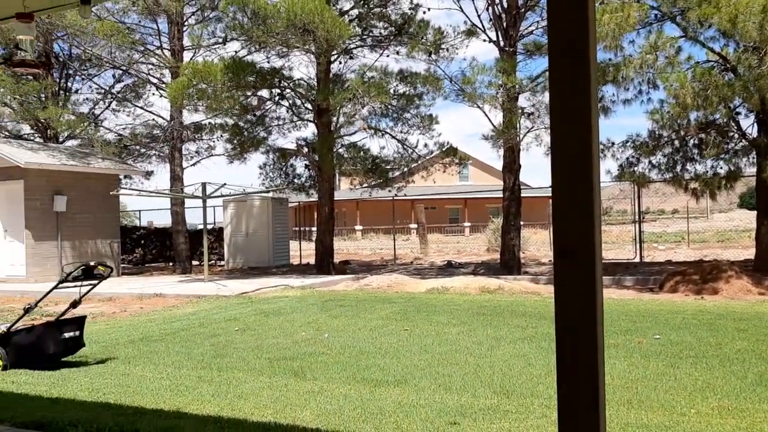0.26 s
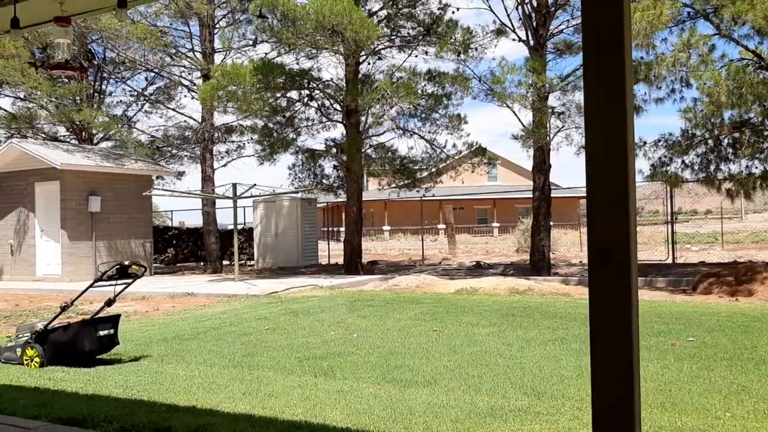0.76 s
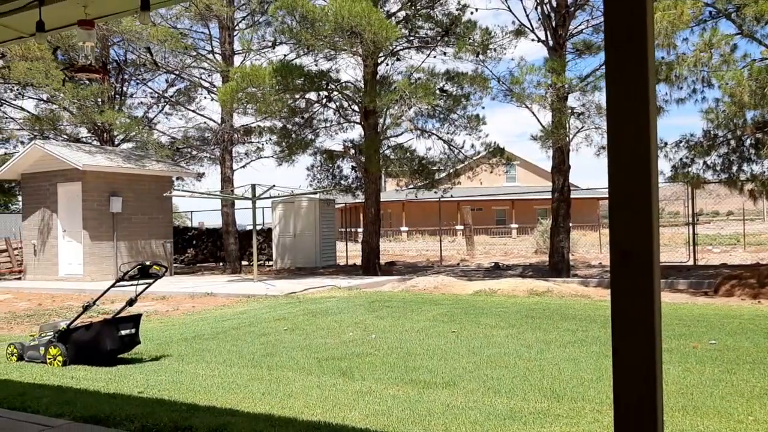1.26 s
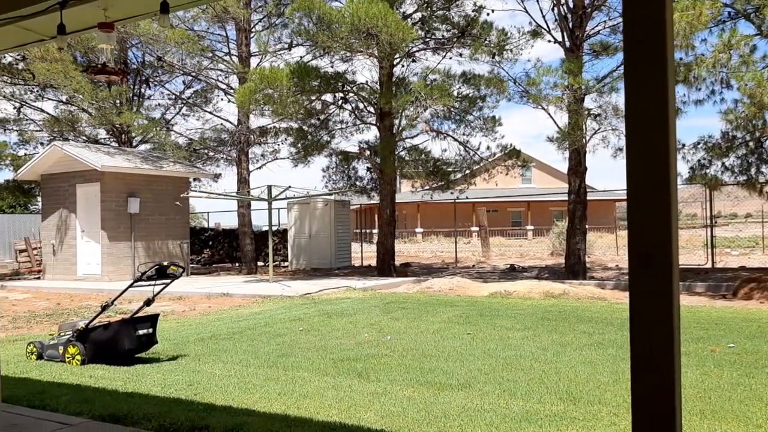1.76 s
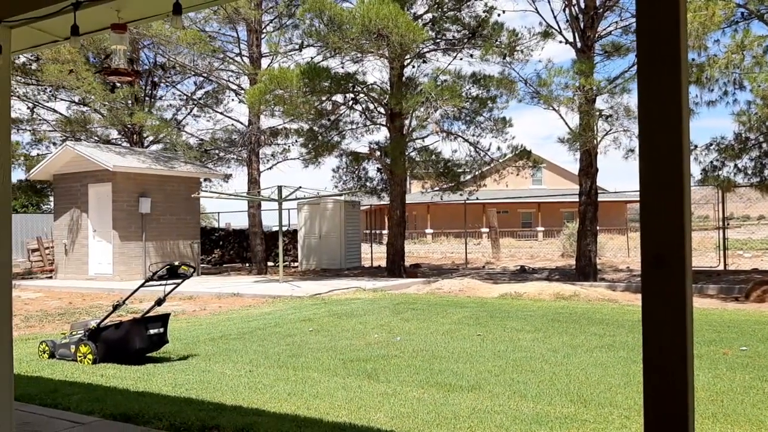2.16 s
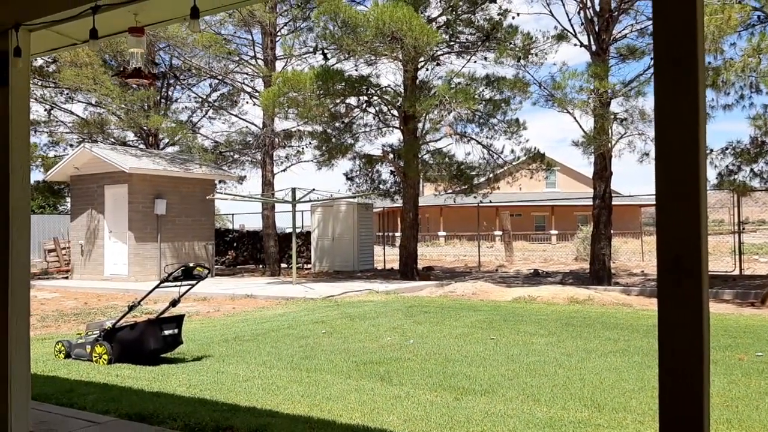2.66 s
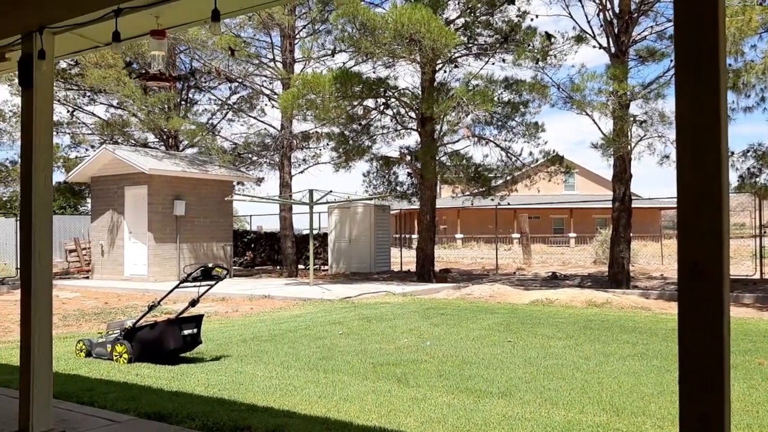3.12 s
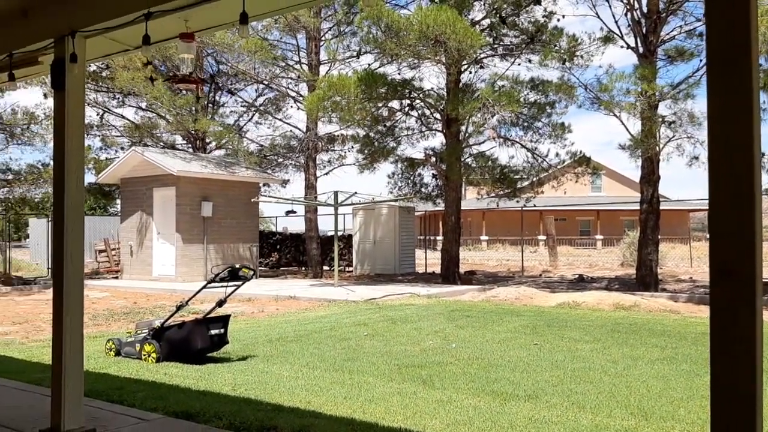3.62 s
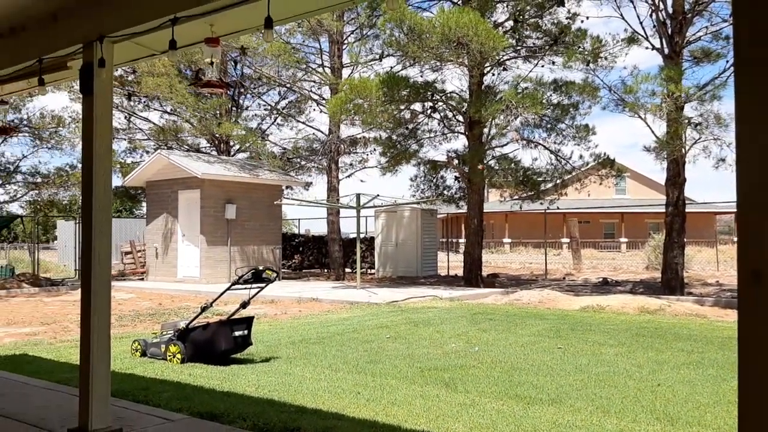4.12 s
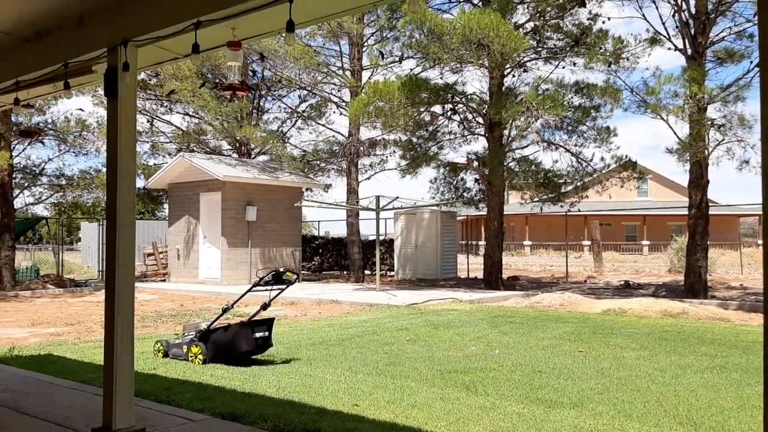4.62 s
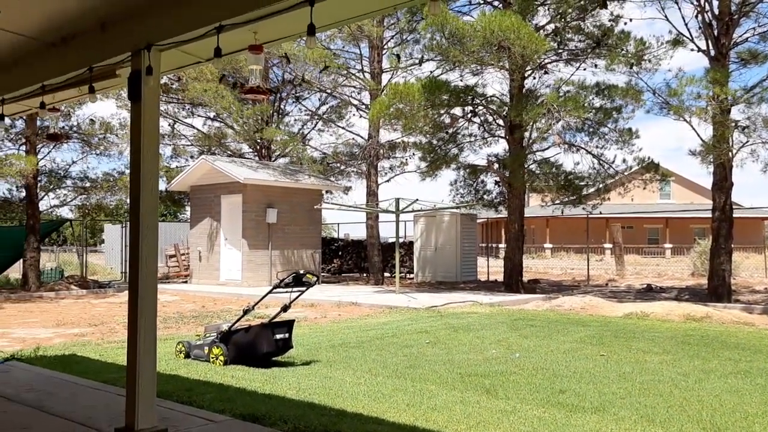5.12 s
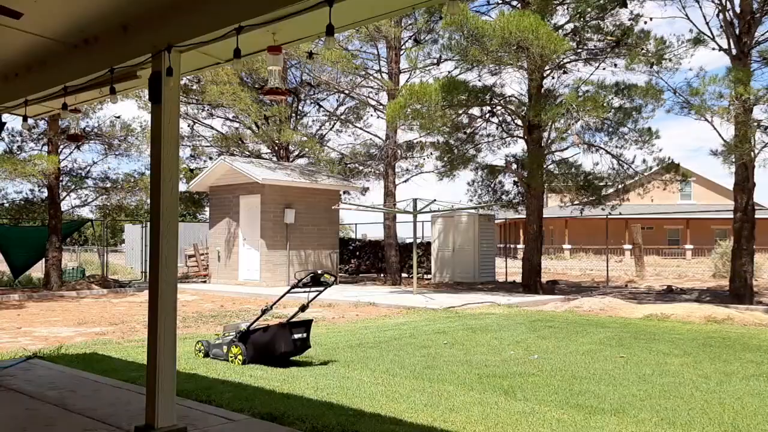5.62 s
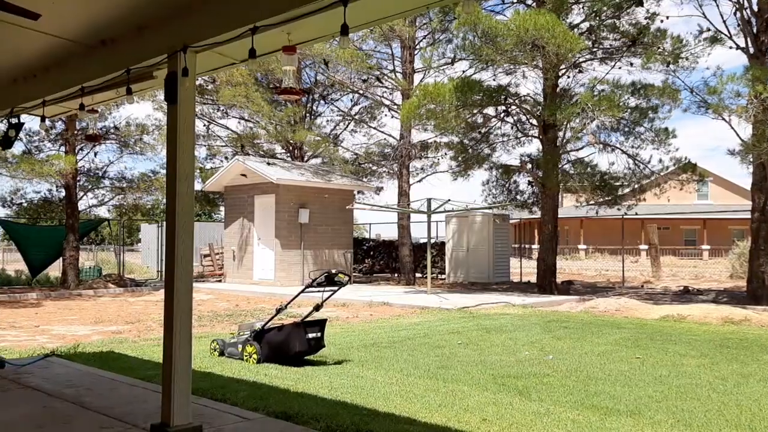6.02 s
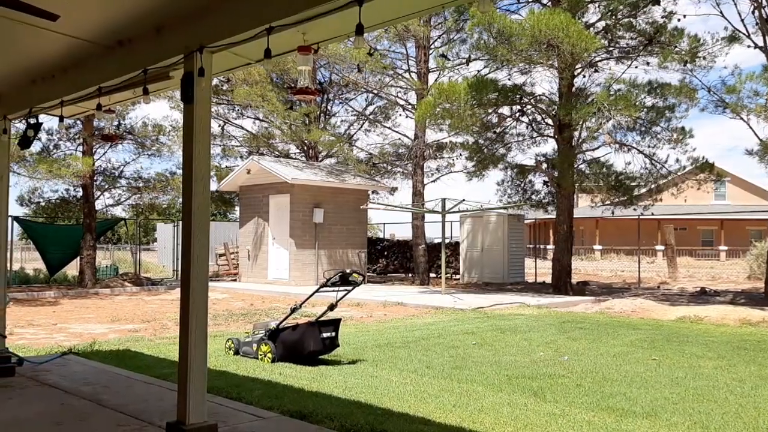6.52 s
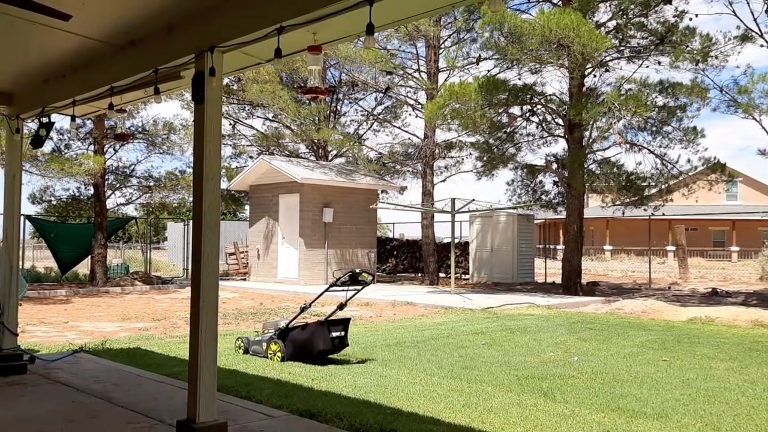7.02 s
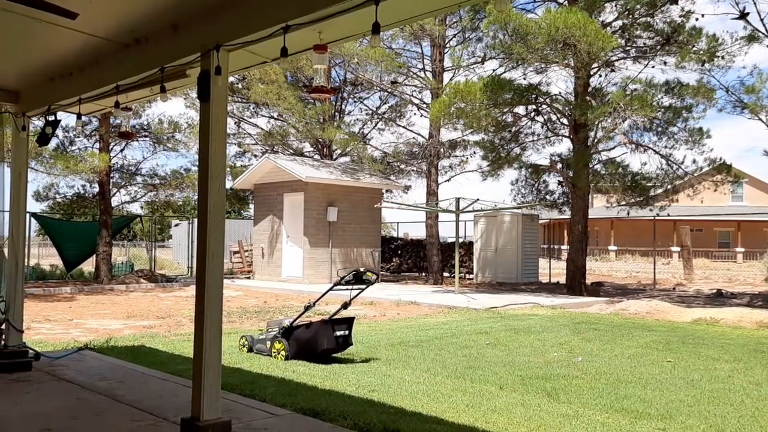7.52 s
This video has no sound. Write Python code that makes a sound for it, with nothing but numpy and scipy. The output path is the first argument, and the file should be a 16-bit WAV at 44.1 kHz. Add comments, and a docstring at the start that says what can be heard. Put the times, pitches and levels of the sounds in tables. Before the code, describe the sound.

Hummingbirds squabble under a porch roof with rasping buzzes, sharp chips and thin squeaks, over distant twitter, low rumble and dull wind bumps.

```python
"""Under a porch roof, hummingbirds squabble round the feeders: rasping buzzes, steep chips and thin squeaks,
all made of gliding sine partials with jittered pitch and level. One bird flies past with wings that whistle
once a stroke. Bounces and a short noise tail scatter every call; more birds twitter beyond, as endless falling
glides. Filtered noise makes the yard, the pines and a breeze whose eddies thump the left microphone port."""
import sys
import numpy as np
from scipy import signal
from scipy.fft import rfft, irfft, next_fast_len
from scipy.io import wavfile
from scipy.ndimage import uniform_filter1d

SR = 44100
rng = np.random.default_rng(int(sys.argv[2]) if len(sys.argv) > 2 else 0)


def pcm_store(signal):
    """Save signal as 16-bit PCM."""
    levels = np.round(np.clip(np.atleast_2d(signal), -1, 1) * 32767)
    wavfile.write(sys.argv[1], SR, levels.astype(np.int16).T)


N = 342638

# What a beak radiates. Each row: frequency in Hz, gain in dB.
BEAK_RESPONSE = [(1400, 7), (2100, 2), (3200, 2), (5000, 2.5), (7300, 5.5), (9000, -2), (12000, 6),
                 (15500, 4)]


def undb(db):
    """Decibels to gain."""
    return 10 ** (np.asarray(db) / 20)


def unit(x):
    """Scale to rms 1."""
    return x / np.sqrt(np.mean(x ** 2) + 1e-20)


def curve(rows):
    """Draw a (seconds, value) table as straight lines, sample by sample."""
    s, value = np.transpose(rows)
    return np.interp(np.arange(N) / SR, s, value)


def gain_at(hz, spectrum):
    """Gain of a (Hz, dB) spectrum at the given frequencies, interpolated over log frequency."""
    f, db = np.transpose(spectrum)
    return undb(np.interp(np.log(np.maximum(hz, 1)), np.log(f), db))


def coloured(x, spectrum):
    """Filter by a (Hz, dB) spectrum."""
    size = next_fast_len(N + SR // 10)
    gain = gain_at(np.fft.rfftfreq(size, 1 / SR), spectrum)
    return irfft(rfft(x, size) * gain, size)[..., :N]


def noise(spectrum):
    """Coloured noise of rms 1."""
    return unit(coloured(rng.standard_normal(N), spectrum))


def wander(t, rate, size=512):
    """Random values, `rate` of them a second, joined by straight lines."""
    return np.interp(t * rate % size, np.arange(size), rng.standard_normal(size))


def partial(hz, order=1):
    """One harmonic of a gliding pitch, faded out between about 17.5 and 18.5 kHz."""
    phase = 2 * np.pi * order * np.cumsum(hz) / SR
    return np.sqrt(2) * np.sin(phase) * np.clip((SR * .42 - order * hz) / 1000, 0, 1)


def fade(t, rise, fall):
    """Rounded rise and fall at the ends of t, in the unit of t."""
    fade_in = np.sin(np.pi / 2 * np.clip((t - t[0]) / rise, 0, 1))
    fade_out = np.sin(np.pi / 2 * np.clip((t[-1] - t) / fall, 0, 1))
    return fade_in * fade_out


def add(out, x, s):
    """Mix x into out from time s."""
    i = int(round(s * SR))
    a, b = max(i, 0), min(i + len(x), N)
    if b > a:
        out[a:b] += x[a - i:b - i]


def add_call(out, call, s, pan_db, bounce=0.82, spread_s=0.023, count=6, ahead=False):
    """A sound reaches each port directly, then by a few random bounces that weaken with delay."""
    for port, side in zip(out, (1, -1)):
        # share the energy between the direct sound and its bounces
        heard = call * undb(side * pan_db / 2) / np.sqrt(1 + count * bounce ** 2 / 2)
        lag = rng.uniform(0, .0003)
        # from straight ahead, the direct sound meets both ports at once
        add(port, heard, s if ahead else s + lag)
        for path in (np.arange(count) + rng.uniform(0, 1, count)) / count:
            add(port, heard * bounce * (1 - path / 2), s + path * spread_s)


def porch(dry, t60=0.16, wet_db=-9, dull_hz=9000):
    """A short diffuse tail between roof, wall and floor: decaying noise, weaker in the top."""
    t = np.arange(SR // 2) / SR
    decay = np.exp(-np.log(1000) * t / t60)
    tail = rng.standard_normal((2, len(t))) * decay * np.minimum(t / 0.024, 1)
    tail /= np.sqrt(np.sum(tail ** 2, axis=1, keepdims=True))
    tail = signal.sosfilt(signal.butter(1, dull_hz, fs=SR, output="sos"), tail)
    return dry + undb(wet_db) * signal.fftconvolve(dry, tail, axes=1)[:, :N]


def pines(centre_hz=800):
    """Air in the pines: a soft rush of noise, independent at each port, that slowly swells and sinks."""
    # Each row: time in seconds, level in dB.
    rush_level = [(0, -57), (1.2, -57.5), (2.6, -54), (4.0, -52.5), (5.0, -51.5), (6.3, -53.5),
                  (7.3, -55.5)]
    rush = [(centre_hz / 4, -6), (centre_hz, 0), (centre_hz * 2, -5), (centre_hz * 8, -30)]
    return np.array([noise(rush), noise(rush)]) * undb(curve(rush_level))


def yard(yard_db=-48, apart_hz=1100, side_share=0.08):
    """Distant rumble and rustling: steady noise, nearly alike at both ports in the bass, apart above."""
    # Each row: frequency in Hz, relative density in dB per Hz.
    yard_spectrum = [(25, -19), (55, 0), (110, 0), (220, 0), (310, -10.5), (430, -8.5), (520, -14.5),
                     (950, -18.5), (1350, -39), (2500, -27), (5000, -27), (15500, -28)]
    side = noise(yard_spectrum)
    highpass = signal.butter(2, apart_hz, "high", fs=SR, output="sos")
    side = side_share * side + (1 - side_share) * signal.sosfilt(highpass, side)
    return (noise(yard_spectrum) + side * np.array([[1], [-1]])) * undb(yard_db)


def wind(breeze_db=1, right_db=-12.5, gust_db=4, buffet_db=0.5):
    """Turbulence rumbles at the exposed left port; single eddies thump it for a cycle or two."""
    # Each row: frequency in Hz, relative density in dB per Hz.
    rumble_spectrum = [(25, -20), (38, -5), (60, 0), (95, -0.5), (150, -9.5), (230, -13.5), (330, -25),
                       (600, -36.5), (1200, -41)]
    # Rumble at the left port. Each row: time in seconds, level in dB before trim and gusts.
    breeze_level = [(0, -49.5), (.3, -44), (.8, -44.5), (1.3, -52), (1.55, -41.5), (1.8, -48.5), (2.4, -36),
                    (2.6, -42), (2.8, -29), (3.1, -35.5), (3.45, -32), (3.6, -37), (4.4, -36), (4.7, -35),
                    (5.15, -34.5), (5.5, -43.5), (5.8, -44), (6.15, -32.5), (6.55, -42), (6.95, -37),
                    (7.1, -48.5), (7.77, -62)]
    # Eddies at the left port. Each row: time in seconds, pitch in Hz, level in dB before trim.
    eddies = [(2.391, 68, -27), (2.693, 72.6, -17.5), (2.819, 143, -14), (2.857, 80, -17.5),
              (2.965, 74.4, -15.5), (2.989, 77.4, -12.5), (3.376, 84.5, -18.5), (3.401, 141, -15.5),
              (3.815, 91, -22), (4.654, 101, -14.5), (4.752, 175, -8.5), (4.828, 97, -19.5),
              (5.63, 86, -21), (5.92, 120, -25), (6.099, 74, -21.5), (6.228, 83, -26), (6.953, 75, -26),
              (6.976, 94, -20.5)]
    t = np.arange(N) / SR
    level_db = curve(breeze_level) + breeze_db
    left, right = (noise(rumble_spectrum) * undb(level_db + gust_db * wander(t, 16)) for _ in range(2))
    for s, hz, db in eddies:
        # small eddies pass sooner: seconds from the middle until the swell has dropped to 1/e
        half = 0.0067 * (100 / hz) ** 1.75
        age = np.arange(-3 * half, 3 * half, 1 / SR)
        thump = -np.sin(2 * np.pi * hz * age) * np.exp(-(age / half) ** 2)
        add(left, thump * undb(db + buffet_db), s + age[0])
    return np.array([left, right * undb(right_db)])


def flock(flock_db=4, count=3):
    """Further birds blur into a twitter: restless falling glides that flare and fade, smeared by reflections."""
    # Each row: frequency in Hz, gain in dB.
    far_colour = [(1000, -32), (1450, -12), (2050, 4), (2900, -2), (4800, -2.5), (6000, 4), (7600, -0.5),
                  (9400, -2), (10500, -4), (15500, 11)]
    # How busy the further birds are. Each row: time in seconds, level in dB before trim.
    busy_level = [(0.0, -48.5), (0.39, -49), (0.95, -49.5), (1.51, -48), (1.71, -51), (2.34, -46),
                  (2.46, -49.5), (2.7, -46.5), (3.22, -50.5), (4.18, -45), (4.35, -51.5), (4.57, -50),
                  (5.15, -47.5), (5.99, -49), (6.58, -49.5), (7.47, -55), (7.64, -50), (7.77, -47.5)]
    t = np.arange(N) / SR
    out = np.zeros((2, N))
    for _ in range(count):
        # around 32 glides a second, each running from 0 to 1
        glide = np.cumsum(32 * undb(5 * wander(t, 25))) / SR % 1
        hz = 1600 * 9 ** (1 - glide) * (1 + .06 * wander(t, 1000, size=8192))
        # a glide lingers in the lows, so its top is lifted to spread the energy evenly
        voice = partial(hz) * np.sqrt(hz * np.sin(np.pi * glide))
        voice = voice * undb(3 * wander(t, 40))
        add_call(out, voice, 0, 0, bounce=0.72)
    twitter = unit(coloured(porch(out, wet_db=-5.5), far_colour))
    return twitter * undb(curve(busy_level) + flock_db)


def excitement(near, answer_s=0.079, join_in=0.41, calm=0.11):
    """The further birds flare up with the calls at the feeders and hush in the gaps: a gain of rms 1."""
    loudness = uniform_filter1d(np.mean(unit(near) ** 2, axis=0), int(answer_s * SR))
    return unit((np.abs(loudness) + calm) ** (join_in / 2))


def tick(ring_s=0.0042, dull_hz=6000):
    """Two small dry clicks: noise that dies within milliseconds, with a softened top."""
    # Each row: start in seconds, level in dB before bounces and softening.
    clicks = [(5.142, -29), (5.162, -33)]
    t = np.arange(SR // 50) / SR
    out = np.zeros((2, N))
    for s, db in clicks:
        click = rng.standard_normal(len(t)) * np.exp(-t / ring_s)
        add_call(out, click * undb(db), s, 0, bounce=.15)
    return signal.sosfilt(signal.butter(1, dull_hz, fs=SR, output="sos"), out)


def wings(beat_hz=42, sharpness=2.6, blur_s=0.5, bend_hz=90, waver_hz=125, wing_db=-1):
    """Air whistles through the wing tips once a stroke; the strokes blur together as the bird flies off."""
    # Whistle of the feathers. Each row: time in seconds, middle pitch in Hz, level in dB before trim.
    whistle = [(2.281, 5880, -40), (2.297, 5840, -37.5), (2.391, 6100, -39), (2.571, 6060, -41),
               (2.64, 6000, -36.5), (2.722, 5980, -44), (2.84, 5800, -42.5), (3.17, 5730, -48)]
    s, pitch_hz, db = np.transpose(whistle)
    t = np.arange(0, s[-1] - s[0], 1 / SR)
    stroke = 2 * np.pi * np.cumsum(beat_hz * (1 + 0.048 * wander(t, 10.9))) / SR
    hz = np.interp(t + s[0], s, pitch_hz)
    hz = hz + bend_hz * np.sin(stroke) + waver_hz * wander(t, 700)
    # sharp pulses of even power, flattening with time
    depth = .5 + sharpness * np.exp(-t / blur_s)
    pulses = np.exp(-depth * np.cos(stroke)) / np.sqrt(np.i0(2 * depth))
    size = pulses * undb(np.interp(t + s[0], s, db) + wing_db)
    out = np.zeros((2, N))
    add_call(out, partial(hz) * size * fade(t, .005, .03), s[0], 0, bounce=0.24, ahead=True)
    return out


def squeaks(squeak_db=-3, flicker_db=2, quaver_hz=170, hoarse=1.2, crest=0.242):
    """Whistles with an octave above rise a little, then droop; the lower they are, the rougher their pitch."""
    # Each row: start in seconds, length in seconds, top pitch in Hz before jitter,
    # share of that pitch lost by the end (0-1), level in dB before trim.
    calls = [(0.089, 0.055, 6170, 0.13, -47), (0.402, 0.053, 3800, 0.08, -47),
             (1.158, 0.035, 3890, 0.24, -45), (1.162, 0.057, 6930, 0.04, -42),
             (1.228, 0.033, 4100, 0.43, -45), (1.262, 0.032, 3130, 0.13, -45.5),
             (1.314, 0.039, 4300, .18, -44), (1.572, 0.056, 4240, 0.3, -41),
             (1.792, 0.043, 7600, 0.16, -39), (1.907, 0.031, 6050, 0.3, -42.5),
             (2.462, 0.081, 4210, 0.07, -44), (2.993, 0.023, 6500, 0.17, -33),
             (4.035, 0.019, 5820, 0.05, -38), (4.4, .075, 7210, 0.1, -41.5),
             (4.466, 0.023, 5950, .2, -40.5), (5.411, 0.054, 7230, 0, -41),
             (5.463, .026, 6130, 0.16, -41.5), (6.269, 0.017, 5700, 0.27, -41),
             (6.553, 0.017, 5700, .11, -40.5), (6.964, 0.014, 5420, .05, -42.5),
             (7.098, 0.059, 7100, 0.07, -41)]
    # Strength of the octave. Each row: top pitch in Hz, gain in dB.
    octave_gain = [(4200, -15.5), (5600, -2.5), (6500, -5.5), (7300, -7)]
    out = np.zeros((2, N))
    for start, length, top_hz, droop, db in calls:
        t = np.arange(0, max(length, .008), 1 / SR)
        # the pitch peaks at the crest, a share of the length
        hz = top_hz * (1 - droop * ((t / t[-1] - crest) / (1 - crest)) ** 2)
        hz = hz + quaver_hz * (6000 / top_hz) ** hoarse * wander(t, 994)
        tone = partial(hz) + gain_at(top_hz, octave_gain) * partial(hz, order=2)
        size = unit(fade(t, .15 * t[-1], 0.1 * t[-1]) * undb(flicker_db * wander(t, 140)))
        add_call(out, tone * size * undb(db + squeak_db), start, 0, bounce=0.47, ahead=True)
    return out


def buzz(length, pitch_hz, bright_db, rate_hz=118, rough=0.407, throb=0.16, flicker_db=3,
         overtone_db=-1, arch_hz=350, voice_top_hz=8560, swing_share=0.712):
    """The syrinx throws its pitch up and lets it fall about 120 times a second, never twice alike."""
    t = np.arange(0, max(length, .01) + 0.003, 1 / SR)
    cycle = 2 * np.pi * np.cumsum(rate_hz * (1 + 0.135 * wander(t, 24.7))) / SR
    saw = np.sin(cycle) + 0.44 * np.sin(2 * cycle)
    # the pitch swings less widely the nearer it lies to the top of the voice
    swing_hz = swing_share * (voice_top_hz - pitch_hz)
    hz = pitch_hz + swing_hz * (0.895 * saw + rough * wander(t, 1300))
    hz = hz + arch_hz * (np.sin(np.pi * t / t[-1]) - .8)
    ground = partial(hz) * gain_at(hz, BEAK_RESPONSE) / undb(7.0)
    # the overtone is strongest at the bottom of each swing
    overtone = undb(bright_db + overtone_db) * partial(hz, order=2) * (1 - .5 * saw)
    size = fade(t, 0.026 * t[-1], 0.34 * t[-1]) * (1 - throb * np.cos(cycle))
    return (ground + overtone) * unit(size * undb(flicker_db * wander(t, 165)))


def chips(end_hz=1550, knee_hz=6000, linger=.3, chip_db=2.5, overtone_db=-2.5, roll_db=-3.5, decay=0.26,
          rasp=0.0312, flicker_db=3, rasp_lead_s=0.005, rasp_s=0.0438, rasp_hz=6810, rasp_db=2.5):
    """With a short rasp the pitch plunges, then curls out below 2 kHz; harmonics follow through the beak."""
    # Each row: time in seconds when the pitch falls through 6 kHz, fall time in ms,
    # level in dB before trim, harshness in dB that lifts overtones and rasp.
    calls = [(0.15, 6.1, -49.5, 0.5), (0.272, 4.3, -53.5, 5), (0.523, 5.1, -53.5, -29),
             (0.598, 4.2, -57.5, 6.5), (0.673, 7.4, -59, 9.5), (0.721, 10, -56, 6), (0.943, 26, -58, 10),
             (1.126, 10.8, -53.5, 1.5), (1.369, 15, -57, 3), (1.477, 13.7, -54.5, 5),
             (1.665, 7.4, -45, 1.5), (1.825, 13, -53.5, 6), (2.037, 9.6, -51, 6), (2.162, 6.4, -52.5, 2.5),
             (2.349, 15, -61, 10), (2.458, 15, -47.5, 0), (2.593, 17, -50, 6), (2.714, 17, -48.5, -7),
             (2.856, 14.3, -50, -1), (3.079, 11.5, -50.5, 6), (3.159, 5.9, -49.5, 4.5),
             (3.266, 15, -50, 6.5), (3.362, 14, -49, 4.5), (3.662, 7.3, -57, 11), (3.769, 16, -52.5, 5),
             (3.807, 12, -51, -2), (3.896, 9.3, -51.5, 3.5), (4.086, 7.9, -55.5, 2), (4.19, 8, -50, 1),
             (4.262, 12, -51, -14), (4.673, 6.6, -48.5, 0.5), (4.817, 5.5, -53, 3.5), (4.893, 4.8, -52, 8),
             (4.977, 4.8, -49.5, 3.5), (5.072, 8.5, -56, 5), (5.122, 7.6, -47, -11), (5.378, 9.4, -54, 4.5),
             (5.626, 6.5, -51, 0.5), (5.925, 9.3, -57.5, 9.5), (6.146, 11.4, -50, 2), (6.453, 8, -51, -6),
             (6.572, 6.8, -51.5, -16), (6.735, 5.9, -45, -3), (6.86, 4.3, -46.5, 0), (6.99, 9.2, -54, -2.5),
             (7.146, 7.9, -47.5, -1.5), (7.275, 5.8, -53, -6), (7.413, 6, -51.5, -3.5),
             (7.457, 11, -58, 6.5), (7.612, 7.6, -48, -12)]
    out = np.zeros((2, N))
    for (s, fall_ms, db, bright_db), pan_db in zip(calls, rng.standard_normal(len(calls))):
        fall = fall_ms / 1000
        # age counts in fall times
        age = np.arange(-.8 * fall, 4.86 * fall, 1 / SR) / fall
        drop = (1 - linger) * np.exp(-1.3 * age) + linger * np.exp(-age / 2)
        hz = (end_hz + (knee_hz - end_hz) * drop) * (1 + rasp * wander(age * fall + 1, 1000))
        overtones = sum(partial(hz, order=k) * gain_at(k * hz, BEAK_RESPONSE) * undb(roll_db * (k - 1.5))
                        for k in range(2, 6))
        # the overtones build up after the onset and die sooner than the low tail
        dying = np.exp(-decay * (age - 1))
        overtones = overtones * fade(age, 0.96, .5) * undb(bright_db + overtone_db) * dying
        tone = partial(hz) * gain_at(hz, BEAK_RESPONSE) + overtones
        size = fade(age, 1.0, 3.53) * dying * undb(flicker_db * wander(age * fall + 1, 400))
        add_call(out, tone * size * undb(db + chip_db), s + age[0] * fall, pan_db, bounce=1.0)
        harsh = buzz(rasp_s, rasp_hz, bright_db=-8) * undb(db + bright_db + rasp_db)
        add_call(out, harsh, s - rasp_lead_s, pan_db)
    return out


def buzzes(buzz_db=-2.0, pan_db=-1.0):
    """Scolding buzzes round the feeders, from brief to drawn out, a little to the right."""
    # Each row: nominal start in seconds (2 ms late), nominal length in seconds (3 ms short), middle pitch in Hz,
    # level in dB before trim, overtone in dB before trim.
    calls = [(0, 0.048, 7020, -41.5, -8), (0.353, 0.2, 7060, -38.5, -4), (0.736, 0.17, 7580, -37, -8),
             (1.3, 0.11, 7050, -38, -10), (1.486, 0.17, 7030, -34.5, -7), (1.853, 0.1, 6900, -40, -6),
             (1.974, 0.063, 7660, -31.5, -2), (2.193, 0.15, 6900, -40.5, -3),
             (2.369, 0.15, 7100, -37.5, -4), (2.577, 0.082, 7350, -46, -3), (2.702, 0.12, 7140, -39, -4),
             (3.232, 0.022, 7560, -28.5, -14), (3.469, 0.098, 6850, -34.5, -3),
             (3.583, .14, 7100, -36.5, -4), (3.732, 0.04, 7600, -30.5, -10),
             (3.785, 0.052, 7020, -34.5, -7), (4.159, 0.025, 7420, -35, -9), (4.209, 0.27, 7160, -42.5, -3),
             (4.619, .084, 7080, -36, -4.5), (5.084, 0.055, 6900, -42, -0.5),
             (5.229, 0.14, 7170, -39.5, -2.5), (5.555, 0.027, 7220, -38.5, -10),
             (5.768, 0.25, 7130, -42, -7), (6.046, 0.17, 7460, -41, -7), (6.365, 0.11, 6920, -35.5, -0.5),
             (6.634, 0.091, 6900, -43.5, -2), (6.718, .03, 7100, -34.5, -2), (7.478, 0.19, 6940, -42.5, -1)]
    out = np.zeros((2, N))
    for start, length, pitch_hz, db, bright_db in calls:
        add_call(out, buzz(length, pitch_hz, bright_db) * undb(db + buzz_db), start - .002, pan_db)
    return out


def scene():
    """The birds under the roof, more birds and the yard beyond, the wind on the microphone."""
    near = chips() + buzzes() + squeaks()
    under_roof = porch(near + wings() + tick())
    beyond = flock() * excitement(near) + yard() + pines()
    return under_roof + beyond + wind()


def record(dry):
    """The microphone adds its colour and the recorder cuts the top steeply."""
    # Colour of the microphone in its port. Each row: frequency in Hz, gain in dB.
    port_colour = [(20, -10), (42, 3), (1380, 0.5), (1500, 6), (1680, 2), (2050, 4.5), (2500, 1),
                   (6800, 1.5), (8100, 8), (8650, 2.5), (9400, 7), (10300, 1.5), (15500, -3)]
    top_cut = signal.ellip(10, .2, 80, 15900, fs=SR, output="sos")
    return signal.sosfilt(top_cut, coloured(dry, port_colour))


dry = scene()
out = record(dry)
pcm_store(out)
```